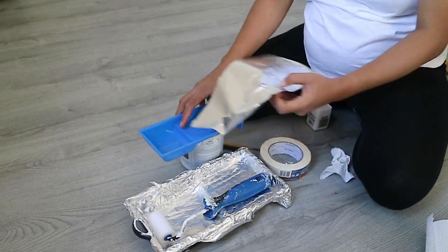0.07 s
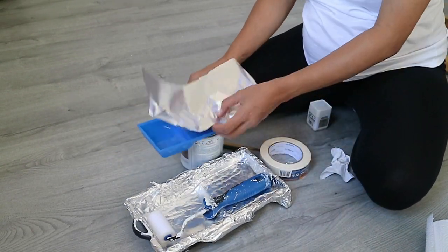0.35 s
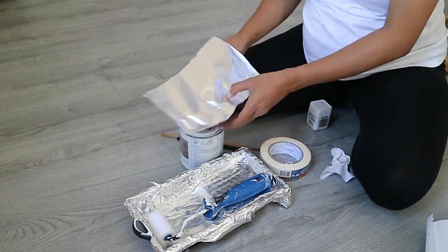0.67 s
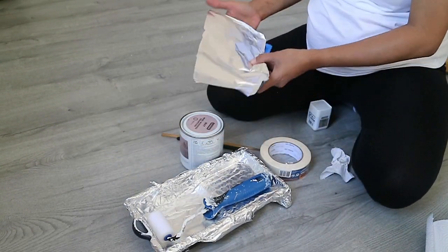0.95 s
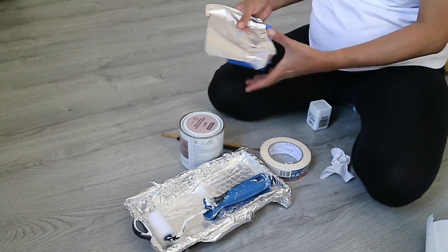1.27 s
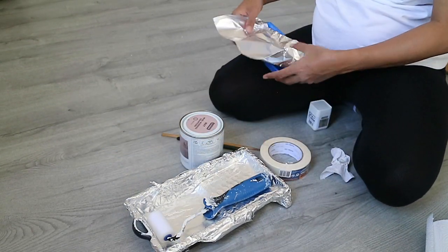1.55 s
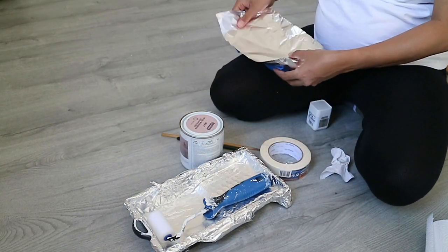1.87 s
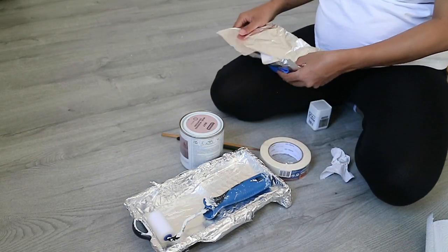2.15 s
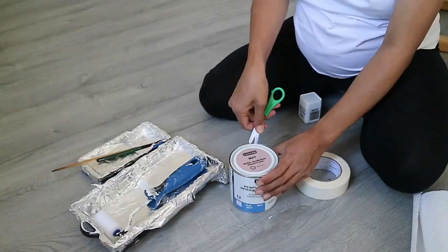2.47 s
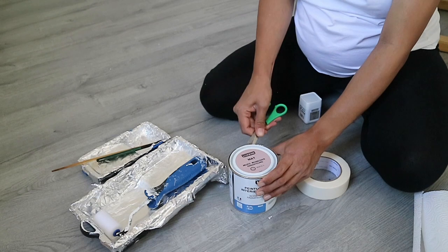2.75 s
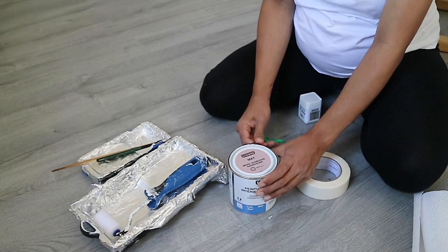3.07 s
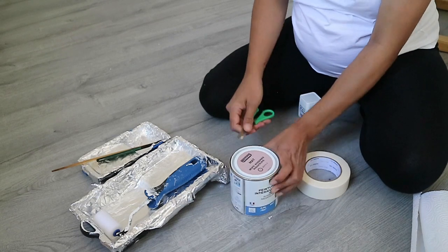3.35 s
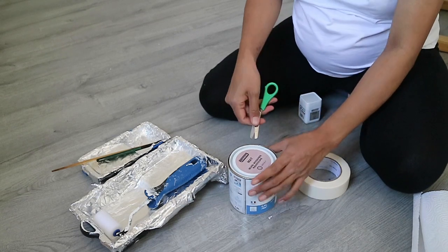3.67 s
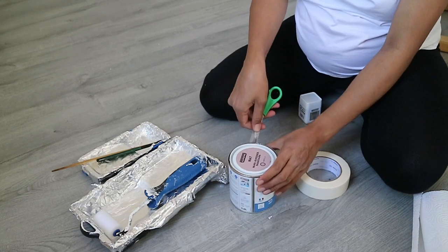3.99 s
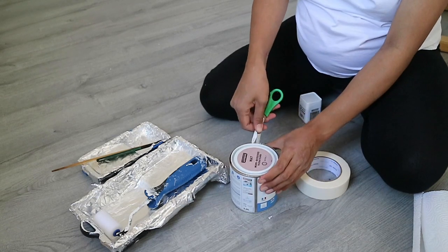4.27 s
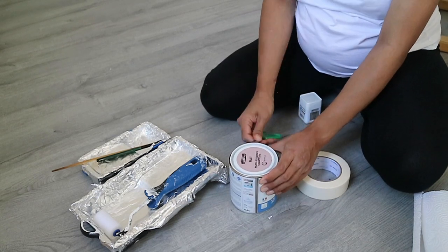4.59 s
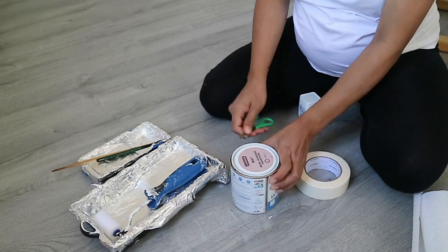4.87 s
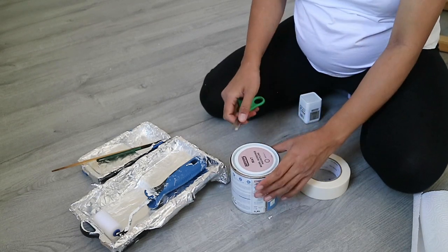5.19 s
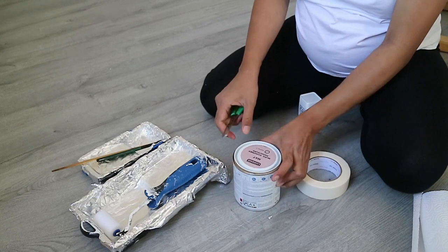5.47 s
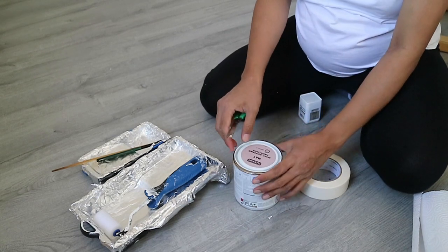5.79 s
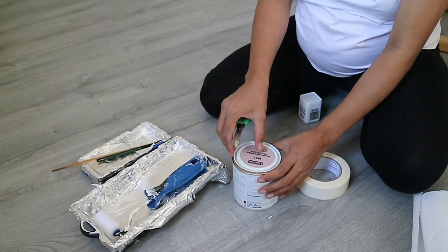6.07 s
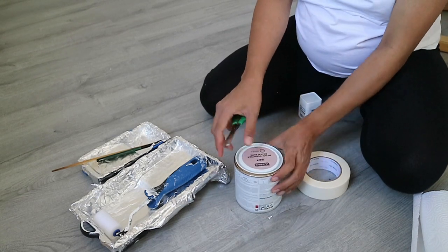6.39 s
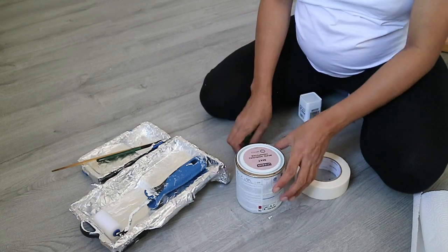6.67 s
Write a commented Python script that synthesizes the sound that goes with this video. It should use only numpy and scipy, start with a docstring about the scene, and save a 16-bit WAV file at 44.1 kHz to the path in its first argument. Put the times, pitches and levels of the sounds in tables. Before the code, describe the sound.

Aluminium foil is wrapped round a plastic tray, crinkling continuously with sharp pops for about two and a half seconds before cutting off abruptly. Scissors prise at a paint tin's lid, which gives with one sharp snap and a brief metallic ring. Quieter taps, blade drags and short scrapes follow as the tin is turned on a wooden floor, ending with a firmer knock. It is heard nearby in a bare, slightly echoing room.

```python
"""Foil and a paint tin in a bare room

Aluminium foil wrapped round a plastic tray buckles in crinkles and pops; its sound is cut off abruptly.
Scissors prise at the lid of a paint tin, which gives with one sharp snap and rings in its modes.
Friction on the wooden floor sounds as the tin is turned in short scrapes, among small taps,
drags of the blade and a thin squeak. The walls reflect it all, over faint room air."""
import sys
import numpy as np
from scipy import signal
from scipy.fft import rfft, irfft, next_fast_len
from scipy.io import wavfile

SR = 44100
rng = np.random.default_rng(int(sys.argv[2]) if len(sys.argv) > 2 else 0)


def persist_wave(psi):
    """Save psi, clipped to +-1, as 16-bit WAV."""
    counts = np.round(np.clip(psi, -1, 1) * 32767).astype(np.int16)
    wavfile.write(sys.argv[1], SR, np.atleast_2d(counts).T)


N = 296774
T = np.arange(N) / SR
HZ = np.fft.rfftfreq(next_fast_len(N + 4000, real=True), 1 / SR)
SPEED_POWER = 1.4  # friction noise grows with this power of the sliding speed
# modes of the free lid: pitch_hz, level_db, t60_s
LID_MODES = [(300, -17, 0.065), (743, -10, .75), (805, -12, .28), (1071, -12, .4), (1118, -19, .45),
             (1443, -12.5, .52), (1929, -5.5, .42), (2453, -6.5, .46), (2509, -14, .34), (2643, -18, .29),
             (2998, -13, .31), (3188, -15, .36), (3322, -8, .44), (3385, -12, .42), (3975, -21, .34),
             (4802, -19, .2)]


def foil():
    """Buckling: tiny facets give way by the thousand, brighter under a harder squeeze."""
    # spectrum of the crinkling: frequency_hz, level_db
    spectrum = [(40, -47), (80, -8.5), (103, -12.5), (124, -0.5), (152, 3.5), (185, -11.5), (240, -2.5),
                (550, -2), (800, -1.5), (1200, -2.5), (1700, -1), (2300, -2), (3050, -6.5), (4100, -4.5),
                (5400, -3), (8300, -12.5), (11600, -16), (15000, -30.5)]
    # the fingers squeeze the sheet: start_s, length_s, rise_s, level_db
    squeezes = [(0.028, 0.095, 0.0093, -45), (0.154, 0.079, 0.018, -41), (0.247, 0.068, 0.0098, -45),
                (0.365, 0.091, 0.014, -42), (0.483, 0.047, 0.016, -41.5), (0.572, 0.043, 0.01, -36.5),
                (0.68, 0.15, 0.029, -37.5), (0.857, 0.041, 0.019, -44), (0.953, 0.1, 0.0072, -38.5),
                (1.077, 0.057, .015, -61), (1.215, 0.081, 0.013, -36), (1.372, 0.056, 0.023, -41),
                (1.558, 0.14, 0.033, -38.5), (1.71, 0.11, 0.06, -33.5), (1.846, 0.043, 0.014, -38.5),
                (1.898, 0.03, 0.025, -33), (1.971, 0.033, 0.026, -37), (2.025, 0.079, 0.03, -34.5),
                (2.149, 0.12, .015, -41), (2.294, 0.24, 0.029, -40.5)]
    # creases collapse in runs of crackles: start_s, level_db, decay_s
    creases = [(0.071, -34, 0.0024), (0.099, -24, .003), (0.167, -34.5, 0.033), (0.31, -34, .007),
               (0.378, -39, 0.025), (0.394, -23, 0.009), (0.5758, -23, 0.0067), (0.603, -29, 0.0076),
               (0.712, -47, .01), (0.954, -25.5, 0.0086), (1.008, -31, .014), (1.122, -35, 0.017),
               (1.204, -36, 0.0054), (1.221, -26, 0.044), (1.553, -36, .004), (1.64, -32, .015),
               (1.769, -45, 0.018), (1.8, -32, .016), (1.922, -28.5, 0.0095), (1.99, -32.5, .012),
               (2.056, -33, 0.013), (2.077, -31, 0.0086), (2.317, -36, 0.025), (2.383, -27, 0.0096),
               (2.432, -27.5, 0.004), (2.537, -27, 0.011)]
    # small panels that flip at random: pitch_hz
    dent_pitches = [786, 1138, 1477, 1850]
    held_db, firm_db, creak_db = -50, -38, -48  # merely held, firmly squeezed, bending
    held = 1 - stroke(1.47, 0.086, rise=0.039, release=0.0091)  # the fingers let go to change grip
    power = (amp(held_db) * held) ** 2
    for start, length, rise, db in squeezes:
        power += (amp(db) * stroke(start, length, rise, release=0.025)) ** 2
    effort_db = 10 * np.log10(power + 1e-6) - firm_db
    fizz_db = 1.5 + 0.78 * effort_db
    colour = amp(read(spectrum, HZ))
    grains = facets(per_s=10000, spread_db=3, ring_s=0.0003, busy_db=2.5, busy_hz=44.95,
                    alike=0.38, count=32)
    grains = unit(shaped(grains, colour * (1 - below(750))), 2500, 8000)
    coarse = shaped(grains, below(3500))
    fine = shaped(grains, 1 - below(9500))
    sharp = grains - coarse + fine * (amp(fizz_db) - 1)
    # a run spreads quickly along its crease and is brighter than the steady crinkling
    runs = sum(amp(2 * db) * np.clip((T - start) / 0.0038, 0, 1) * np.exp(-2 * abs(T - start) / decay)
               for start, db, decay in creases)
    coarse_power = power + amp(-11) * runs + amp(2 * creak_db) * held
    crackle = (sharp * np.sqrt(power + runs) + coarse * np.sqrt(coarse_power)) * amp(1.3 * wander(90))
    dents = sum(signal.oaconvolve(clicks(per_s=8, spread_db=3), flip(hz, swell_s=0.00043))[:N]
                for hz in dent_pitches)
    dents *= amp(-34.5 + effort_db / 2)
    # the whole sheet flutters, less and less as it closes round the tray
    flutter = facets(per_s=2500, spread_db=0.5, ring_s=0.00058, busy_db=1, busy_hz=24.47,
                     alike=0.85, count=12)
    flutter = unit(shaped(flutter, colour * below(950)), 120, 700)
    flutter *= amp(-47 + 0.08 * effort_db - 1.7 * T)
    return room(crackle + dents + flutter, wet_db=-0.5, left=0.91, places=4)


def pops():
    """Snap-through: large foil panels reverse their curve and ring; early reflections follow."""
    # a panel buckles through: start_s, level_db, pitch_hz, swell_s
    buckles = [(0.0468, -10.5, 1480, 0.00067), (0.0724, -14.5, 1418, 0.00052), (0.263, -8, 1540, 0.00079),
               (0.5764, -15, 1647, 0.00054), (1.035, -20.5, 1420, 0.00057), (1.414, -25, 1320, 0.00089),
               (1.567, -30, 1980, 0.00065), (1.683, -30, 1690, 0.00061), (1.813, -23, 1528, 0.001),
               (1.858, -25, 1610, 0.00084), (1.925, -26.5, 1590, 0.00076), (2.5382, -15.5, 1730, 0.00064),
               (2.542, -30, 1980, 0.0023), (2.541, -30.5, 850, 0.0056)]
    # modes of a flipped panel: pitch_ratio, level_db, t60_s
    panel_modes = [(.415, -30, .25), (.54, -27, 0.35), (0.919, -20.5, 0.4), (0.983, -30, 0.4),
                   (1.519, -32.5, 0.35)]
    # reflections from floor, walls and ceiling: delay_s, level_db, right_lag_s
    reflections = [(.0027, -23.5, 0.0041), (.0093, -17.5, 0.0096), (0.017, -8, .0001),
                   (0.0252, -8.5, 0.0037), (0.0318, -10.5, .0001), (.047, -13.5, -0.0029)]
    flips, ringing, reflected = np.zeros(N), np.zeros(N), np.zeros((2, N))
    for start, db, hz, swell in buckles:
        surround = amp(-14) * flip(hz * 0.515, swell * 2.2)  # the sheet around follows more slowly
        add(flips, start, amp(db) * (flip(hz, swell, roundness=2.25) + surround))
        modes = [(hz * ratio, level, t60) for ratio, level, t60 in panel_modes]
        add(ringing, start, amp(db) * ring(modes))
    for delay, db, lag in reflections:
        add(reflected[0], delay, amp(db) * flips)
        add(reflected[1], delay + lag, amp(db) * flips)
    sound = shaped(flips + ringing + reflected, 1 - below(380))
    return room(sound, wet_db=-1) * amp([[0.4], [-1.4]])


def snap(size=30000):
    """Sudden release of strain: the rim jumps from its groove, chatters and leaves the lid ringing."""
    # the lid gives: start_s, level_db
    releases = [(3.0547, -4)]
    # heavily damped modes of the rim: pitch_hz, level_db, t60_s
    rim_modes = [(280, -33.5, 0.0087), (790, -13.5, 0.0072), (1495, -10.5, 0.0027), (1990, -11, 0.017),
                 (2500, -15, 0.014), (3200, -4.5, 0.0086), (3960, -2, 0.003), (4930, -8, 0.0078),
                 (6770, -1, 0.0031), (8450, -0.5, 0.001), (11400, -11, .002), (14480, -16.5, .0016)]
    crack, chatter, ringing = np.zeros(N), np.zeros(N), np.zeros((2, N))
    slip = ring(rim_modes[::2]) - ring(rim_modes[1::2])  # neighbouring modes swing in opposite senses
    for start, db in releases:
        add(crack, start, amp(db) * slip)
        add(crack, start + 0.0008, amp(db - 10.5) * slip)  # the rim lets go in two jerks
        add(ringing[0], start, amp(db - 25) * ring(LID_MODES, phase_rad=0.27))
        add(ringing[1], start, amp(db - 25.5) * ring(LID_MODES, phase_rad=-0.27))
        rattle = rng.standard_normal(size) * np.exp(-T[:size] / 0.0045)
        add(chatter, start + 0.00089, amp(db - 14) * rattle)
    chatter = shaped(chatter, below(8400) * (1 - below(600, order=2)))
    # so small a lid radiates little bass
    burst = shaped(crack + chatter, (1 - below(110)) * below(14000))
    ringing = shaped(ringing, 1 - below(260))
    return room(burst, wet_db=-5, left=0.6) * amp([[-0.4], [0.4]]) + room(ringing, wet_db=-11, left=0.3)


def taps(size=30000):
    """Impact excitation: each contact knocks, ticks and sets tin, lid and floor vibrating."""
    # blade and fingers meet the tin:
    # start_s, knock_db, knock_hz, ring_db, ring_centre_hz, lid_db, tick_db, thud_db
    contacts = [(2.771, -62, 900, -72.5, 890, -80, -56, -73), (2.972, -62, 900, -76, 880, -83, -60, -82),
                (3.345, -39, 1450, -40, 870, -68, -35.5, -58),
                (3.5805, -48, 850, -55, 846, -72, -62.5, -58),
                (3.9524, -42.5, 560, -48, 880, -64, -63, -83),
                (3.9868, -36.5, 630, -56, 900, -73, -38.5, -74),
                (4.1001, -37.5, 661, -62, 803, -61, -49, -68.5),
                (4.2255, -38, 830, -61, 836, -70, -50, -73.5), (4.571, -37, 720, -47, 520, -54, -51, -54),
                (4.7279, -31.5, 880, -33.5, 467, -56, -46, -44.5),
                (5.09, -49, 1040, -71, 1060, -76.5, -57, -65),
                (5.2942, -47.5, 870, -64, 897, -76, -64, -57),
                (6.2027, -27.5, 1260, -36.5, 1164, -67, -43.5, -54),
                (6.205, -33.5, 407, -37, 385, -76, -57, -66)]
    # modes of the tin held in the hand: pitch_hz, level_db, t60_s
    tin_modes = [(290, -6.5, 0.18), (474, -1, 0.075), (690, -14, 0.067), (840, -2, 0.058),
                 (1077, -15, 0.26), (1194, -11, 0.3), (1270, -15, 0.55), (1340, -14, 0.55),
                 (1975, -6.5, 0.054), (2170, -8, .04)]
    fall_db_per_octave = 12  # modes far from the ring centre are barely excited
    thud = ring([(72.8, -7, 0.16), (140.8, -11.5, 0.085), (222, 2.5, 0.12), (269, -3.5, 0.093)])
    lid = ring(LID_MODES)
    body, pings, ticks = np.zeros((3, N))
    for start, knock_db, knock_hz, ring_db, centre_hz, lid_db, tick_db, thud_db in contacts:
        modes = [(hz, db - fall_db_per_octave * abs(np.log2(hz / centre_hz)), t60)
                 for hz, db, t60 in tin_modes]
        knock = flip(knock_hz, swell_s=0.00065, size=size)
        add(body, start, amp(knock_db) * knock + amp(ring_db) * ring(modes) + amp(thud_db) * thud)
        add(pings, start, amp(lid_db) * lid)
        add(ticks, start, amp(tick_db) * rng.standard_normal(size) * np.exp(-T[:size] / 0.0042))
    body = shaped(body, 1 - below(76))
    pings = shaped(pings, below(2120, order=12))  # a light touch rings only the lid's lower modes
    ticks = shaped(ticks, below(6500) * (1 - below(1400, order=2)))
    return room(body + pings + ticks, wet_db=0.5, left=0.27)


def turns():
    """Sliding friction: the tin's rim judders over the boards and grit hisses, both rising with speed."""
    # the tin is turned on the floor: start_s, length_s, top_speed_share (of the length), rub_db, grit_db
    twists = [(2.687, 0.1, 0.45, -60, -69.5), (3.134, 0.085, 0.33, -47.5, -53.5),
              (3.308, 0.18, 0.83, -44.5, -55.5), (3.445, 0.16, 0.77, -52, -69.5),
              (3.776, 0.54, 0.39, -55.5, -68), (4.47, 0.25, 0.39, -60, -75.5),
              (4.706, 0.26, 0.52, -52.5, -63), (5.312, 0.35, 0.58, -45, -56), (5.887, 0.34, 0.41, -60, -74),
              (6.295, 0.3, 0.61, -48, -62.5)]
    # spectrum of the hollow rub: frequency_hz, level_db
    spectrum = [(80, -29.5), (140, -20.5), (220, -11), (340, -4), (480, -5.5), (610, 0), (780, 1.5),
                (1200, -3.5), (1700, -7), (2900, -16), (5000, -18.5), (7000, -32), (10000, -36),
                (12000, -48), (15000, -60)]
    rub_gain = amp(-70.5) * (T > 2.1)  # a hand steadies the tin, which rubs faintly
    grit_gain = np.zeros(N)
    for start, length, top, rub_db, grit_db in twists:
        friction = swing(start, length, top) ** SPEED_POWER
        rub_gain = np.hypot(rub_gain, amp(rub_db) * friction)
        grit_gain = np.hypot(grit_gain, amp(grit_db) * friction)
    slips = facets(per_s=3600, spread_db=1.6, ring_s=0.0015, busy_db=3, busy_hz=9.2, alike=0.35, count=24)
    slips = shaped(slips, amp(read(spectrum, HZ)))
    rub = unit(shaped(slips, below(2000)), 300, 1800) * amp(1.3 * wander(70))
    grit = unit(shaped(slips, 1 - below(2000)), 2500, 5200)
    return room(rub * rub_gain + grit * grit_gain, wet_db=1, left=0.74, places=3)


def blade():
    """Stick-slip: the blade drives two hollow lid resonances, which shift with the point of contact."""
    # the scissor blade drags round the lid: start_s, length_s, level_db, pitch_hz
    drags = [(3.825, 0.406, -57, 846), (4.496, 0.23, -64.5, 747)]
    out = np.zeros(N)
    for start, length, db, hz in drags:
        slips = clicks(per_s=1700, spread_db=1.8) * amp(2 * wander(45))
        note_hz = hz * (1 + 0.023 * wander(10))
        lower = resonate(slips, note_hz, width_hz=32)
        upper = amp(-9) * resonate(slips, note_hz * 1.13, width_hz=33)
        out += amp(db) * unit(lower + upper) * stroke(start, length, rise=0.11, release=0.018)
    return room(out, wet_db=2.5, left=0.2)


def skid():
    """Friction noise: the blade skids off the rim in one bright scratch of dense slips."""
    # spectrum of the scratch: frequency_hz, level_db
    spectrum = [(150, 2), (700, 5.5), (2100, 3), (3000, -10.5), (4700, -0.5), (6500, -9), (9500, -13),
                (12000, -26), (15000, -28)]
    slips = facets(per_s=7000, spread_db=2.5, ring_s=0.00032, busy_db=-0.5, busy_hz=40.6,
                   alike=0.72, count=6)
    scratch = unit(shaped(slips, amp(read(spectrum, HZ))))
    speed = swing(start=4.682, length=0.048, top=0.75)
    return room(scratch * amp(-45) * speed ** SPEED_POWER, wet_db=-1.5)


def squeak():
    """Frictional oscillation: as the tin comes to rest, two close tones glide up, level off and fade."""
    start_s, glide_s = 4.925, 0.045
    top_hz, glide_hz, jitter_hz, twin_gap_hz = 5710, 1000, 22, 290
    hz = top_hz - glide_hz * np.exp(-np.maximum(T - start_s, 0) / glide_s) + jitter_hz * wander(300)
    phase = 2 * np.pi * np.cumsum(hz) / SR
    tones = np.sin(phase) + amp(-11) * np.sin(phase + 2 * np.pi * twin_gap_hz * T)
    envelope = amp(-71.5 + 2 * wander(40)) * stroke(start_s, length=0.19, rise=0.035, release=0.06)
    return room(tones * envelope, wet_db=0)


def hush():
    """Ambient noise: still room air, very wide, and a faint wavering drone."""
    # spectrum of the air: frequency_hz, level_db
    spectrum = [(15, -68.5), (25, -40), (76, -10), (108, -26.5), (130, -6.5), (229, -15.5), (263, -3.5),
                (293, -21), (326, -4), (463, -14), (1100, -18), (1190, -16), (3160, -25), (5730, -30.5),
                (16000, -50)]
    # stereo width of the air: frequency_hz, side_minus_mid_db
    width = [(40, -3.5), (130, 3), (300, 4.5), (750, 5.5), (1500, 3), (3000, 2), (8000, 1)]
    # tones of the drone: pitch_hz, level_db
    tones = [(138, -82), (87, -86.5)]
    mid, side = shaped(rng.standard_normal((2, N)), amp(read(spectrum, HZ)))
    side = shaped(side, amp(read(width, HZ)))
    air = unit(np.array([mid + side, mid - side]))
    drone = np.zeros((2, N))
    for hz, db in tones:
        phase = 2 * np.pi * hz * T
        drone += amp(db) * (wander(24) * np.sin(phase) + wander(20) * np.cos(phase))
    return amp(-64) * lean(air, left=0.2) + lean(drone)


def room(x, wet_db, left=0.65, places=1):
    """Direct and diffuse fields add in power; a moving source wanders among places with unlike echoes."""
    shares = np.array([wander(6) for _ in range(places)]) if places > 1 else np.ones((1, N))
    wet = sum(echo(x * share) for share in shares / np.linalg.norm(shares, axis=0))
    return lean((x + amp(wet_db) * wet) / np.hypot(1, amp(wet_db)), left)


def echo(x, size=24000):
    """Reverberation: sparse reflections decay exponentially, weakly correlated between the sides."""
    # reverberation time of the room: frequency_hz, t60_s
    decay_times = [(100, 0.47), (500, 0.38), (1400, 0.38), (3700, 0.43), (7000, 0.38), (14000, 0.35)]
    arrivals = rng.standard_normal((2, size)) * (rng.random((2, size)) < 0.12) * (T[:size] > 0.002)
    hz, t, bands = signal.stft(arrivals, SR, nperseg=256)
    coherence = read([(100, 0.1), (500, 0.1), (1400, 0.3), (3000, -0.1)], hz)[:, None]
    bands[1] = coherence * bands[0] + np.sqrt(1 - coherence ** 2) * bands[1]
    tail = signal.istft(bands * amp(-60 * t / read(decay_times, hz)[:, None]), SR, nperseg=256)[1]
    tail /= np.linalg.norm(tail, axis=1, keepdims=True)
    return signal.fftconvolve(np.atleast_2d(x), tail, axes=1)[:, :N]


def lean(pair, left=1):
    """Level difference: the bass tilts left, by a share that depends on where the source is."""
    # the full tilt: frequency_hz, left_minus_right_db
    tilt = [(40, -4), (110, 3), (200, 16.5), (380, 7), (700, 3.5), (1400, 0.3), (4000, 1), (15000, -.5)]
    return shaped(pair, amp(left * np.outer([0.5, -0.5], read(tilt, HZ))))


def facets(per_s, spread_db, ring_s, busy_db, busy_hz, alike, count, size=256):
    """Shot noise from count patches, each with its own ring and loud spells; alike correlates the sides."""
    out = np.zeros((2, N))
    for _ in range(count):
        common = np.sqrt(alike) * rng.standard_normal(size)
        separate = np.sqrt(1 - alike) * rng.standard_normal((2, size))
        patch = (common + separate) * np.exp(-T[:size] / ring_s)
        train = clicks(per_s / count, spread_db) * amp(busy_db * wander(busy_hz))
        out += signal.oaconvolve(train[None], patch / np.linalg.norm(patch), axes=1)[:, :N]
    return out


def clicks(per_s, spread_db):
    """A Poisson train of impulses, many small and a few large."""
    impulses = (rng.random(N) < per_s / SR) * rng.choice([-1, 1], N)
    return impulses * amp(spread_db * np.minimum(rng.exponential(1, N), 4))


def flip(hz, swell_s, size=2000, roundness=1):
    """The transient of a thin sheet jumping through: a few cycles that swell and die."""
    t = T[:size]
    return -(t / swell_s * np.exp(1 - t / swell_s)) ** roundness * np.sin(2 * np.pi * hz * t)


def ring(modes, size=30000, phase_rad=0):
    """Free decay of modes (pitch_hz, level_db, t60_s); neighbours lead and lag by phase_rad."""
    t = T[:size]
    return sum(amp(db - 60 * t / t60) * np.sin(2 * np.pi * hz * t + phase_rad * (-1) ** k)
               for k, (hz, db, t60) in enumerate(modes))


def resonate(x, hz, width_hz):
    """Forced vibration of a resonance that follows the curve hz."""
    carrier = np.exp(2j * np.pi * np.cumsum(hz) / SR)
    pole = np.exp(-np.pi * width_hz / SR)
    return (carrier * signal.lfilter([1 - pole], [1, -pole], x / carrier)).real


def stroke(start, length, rise, release):
    """Envelope of one push of the hand: it builds, holds and lets go (times in seconds)."""
    return np.clip((T - start) / rise, 0, 1) * np.exp(-np.maximum(T - start - length, 0) / release)


def swing(start, length, top):
    """Speed of a twist of the wrist: from rest to 1 at the share top of its length, and back."""
    return np.sin(np.pi * np.interp(T, [start, start + top * length, start + length], [0, 0.5, 1])).clip(0)


def wander(hz):
    """A random curve of rms 1, with hz new values a second."""
    knots = rng.standard_normal(4000)
    return np.interp(T * hz, np.arange(len(knots)), knots) / np.sqrt(2 / 3)


def amp(db):
    """Decibels to gain."""
    return 10 ** (np.asarray(db) / 20)


def read(points, hz):
    """Interpolates (frequency_hz, value) points on a log-frequency axis."""
    frequency, value = np.transpose(points)
    return np.interp(np.log(hz + 1), np.log(frequency + 1), value)


def add(mix, start_s, sound):
    """Superposes a sound on the mix."""
    part = mix[max(round(start_s * SR), 0):][:len(sound)]
    part += sound[:len(part)]


def shaped(x, gain):
    """Filters by a gain for each frequency."""
    size = 2 * (len(HZ) - 1)
    return irfft(rfft(x, size) * gain, size)[..., :N]


def below(hz, order=4):
    """Gain of a smooth low-pass."""
    return 1 / (1 + (HZ / hz) ** order)


def unit(x, low_hz=0, high_hz=SR):
    """Scales x to rms 1 within a band."""
    return x / (np.std(shaped(x, (HZ >= low_hz) & (HZ <= high_hz))) + 1e-12)


def scene():
    """Gating: the foil sound is cut off, echo and all, leaving a faint fading tail; the tin follows."""
    cut_s = 2.548
    foil_gain = amp(np.interp(T - cut_s, [-0.004, 0.0029, 0.035, 0.54], [-0.5, -18, -28.5, -87]))
    return (foil() + pops()) * foil_gain + snap() + taps() + turns() + blade() + skid() + squeak() + hush()


def record(dry):
    """Band limiting: a steep linear-phase low-pass removes the highest treble."""
    edge_hz = 15850
    low_pass = signal.firwin(401, edge_hz, window=("kaiser", 9), fs=SR)
    return signal.oaconvolve(dry, low_pass[None], "same")


dry = scene()
out = record(dry)
persist_wave(out)
```